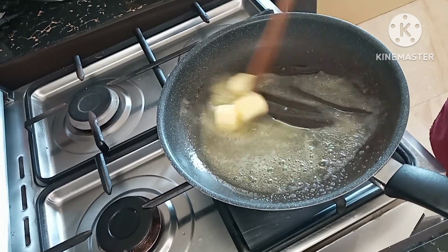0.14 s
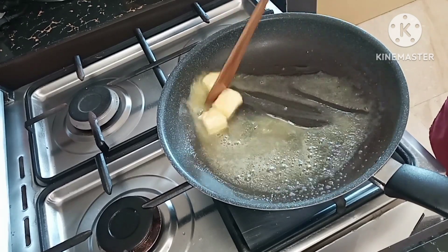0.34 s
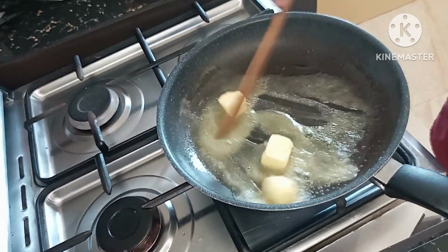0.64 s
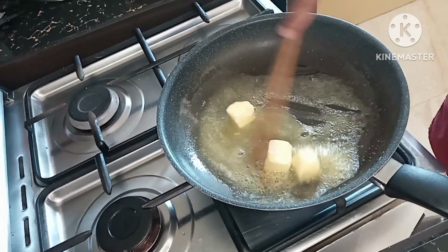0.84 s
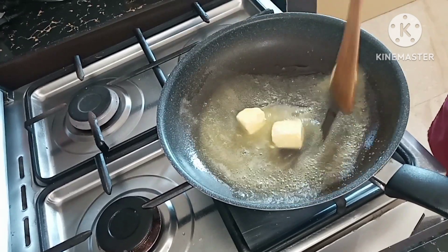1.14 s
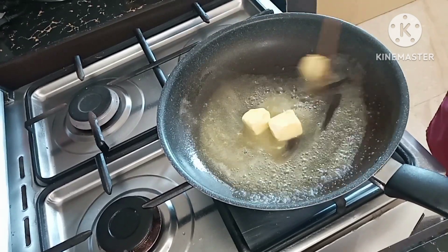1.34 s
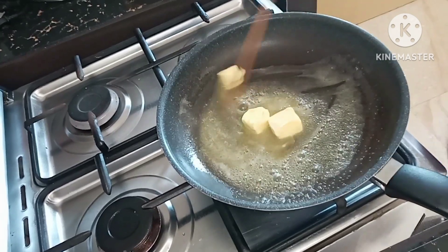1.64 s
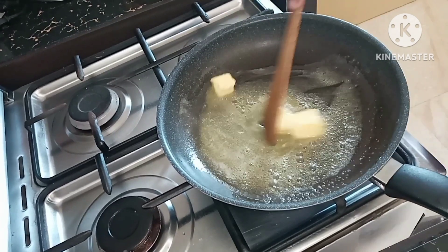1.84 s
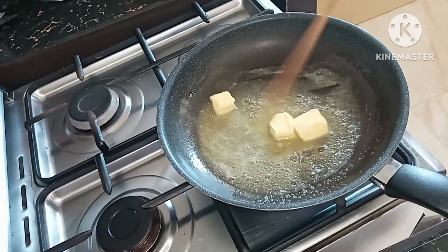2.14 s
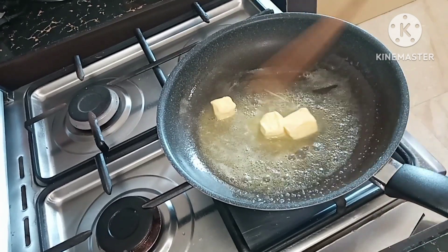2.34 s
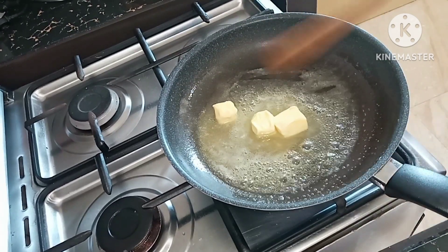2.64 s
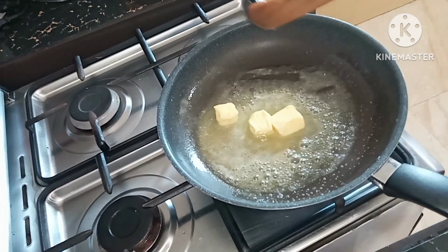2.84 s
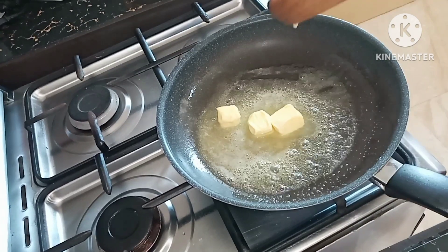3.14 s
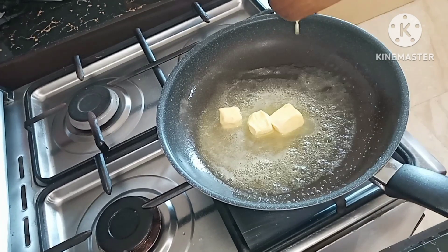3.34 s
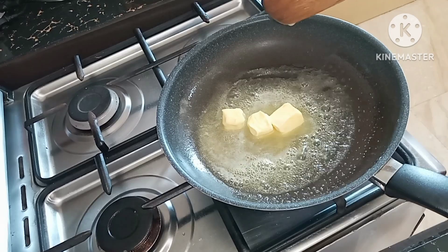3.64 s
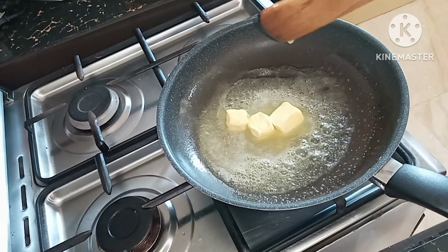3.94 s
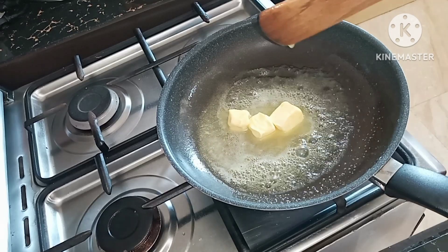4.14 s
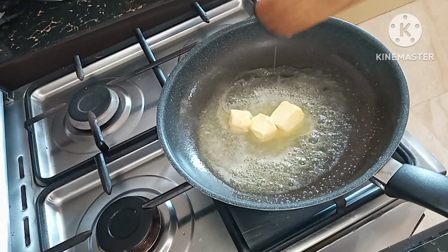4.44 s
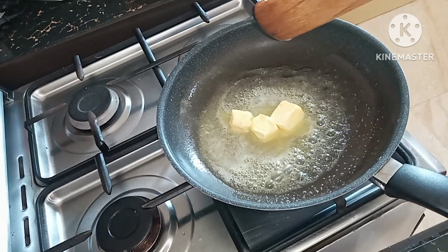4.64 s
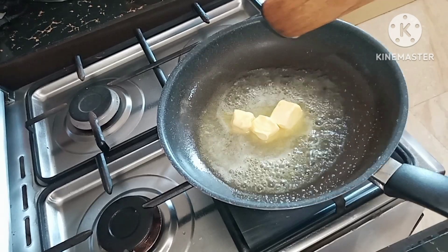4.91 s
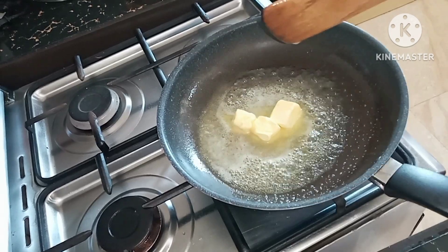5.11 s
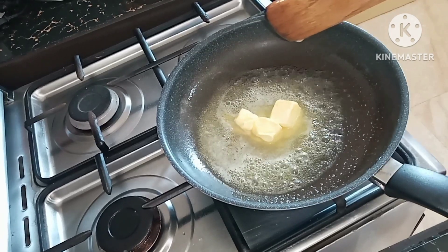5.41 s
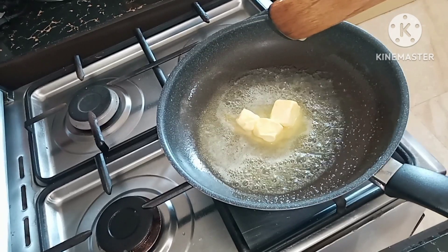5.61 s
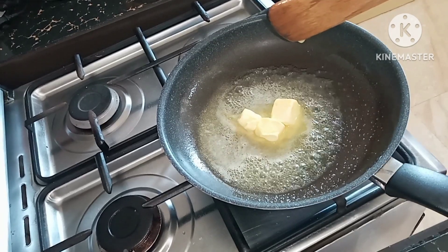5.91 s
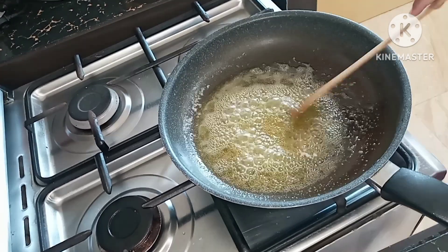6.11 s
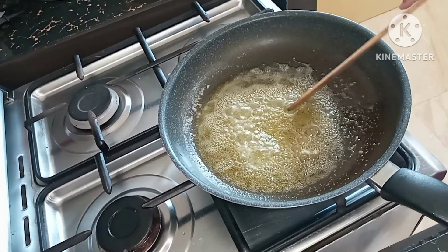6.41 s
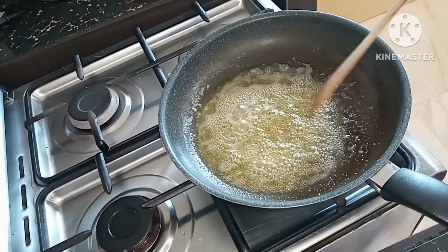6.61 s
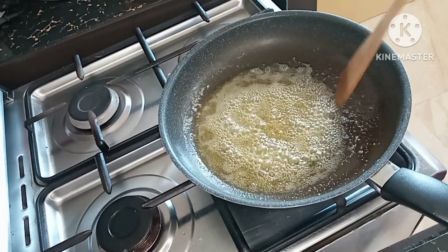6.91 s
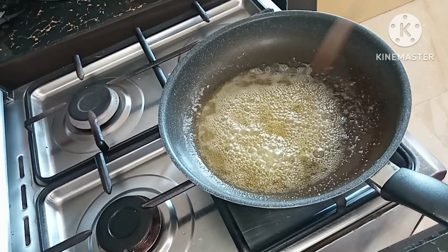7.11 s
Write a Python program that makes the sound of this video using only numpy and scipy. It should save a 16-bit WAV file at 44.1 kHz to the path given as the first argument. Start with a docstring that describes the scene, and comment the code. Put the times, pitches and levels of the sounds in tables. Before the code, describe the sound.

Butter sizzles and pops in a frying pan as a wooden spatula knocks lightly; after a brief silence, it foams with lower bubbling.

```python
"""Kitchen, close to a frying pan on a gas stove; stereo microphone, each of its two ports with its own colour.
From the start the burner rumbles and butter sizzles: water under the fat bursts as tiny steam bubbles
over a fine hiss, and the handled pan sets the stove droning. Until about 3.5 s a wooden spatula knocks
and rubs the pan. The sizzle deepens as the butter melts, then fades to silence at 6.1 s. At 6.4 s the
sound returns: the butter is now a foam of larger, lower bubbles."""
import sys
import numpy as np
from scipy import signal
from scipy.fft import rfft, irfft, next_fast_len
from scipy.io import wavfile
from scipy.ndimage import uniform_filter1d, map_coordinates

SR = 44100
rng = np.random.default_rng(int(sys.argv[2]) if len(sys.argv) > 2 else 0)


def generate_wav(sig):
    """Save sig (samples, or channels by samples) to the path in sys.argv[1] as 16-bit PCM at SR."""
    pcm = np.round(np.clip(np.atleast_2d(sig).T, -1, 1) * 32767).astype(np.int16)
    wavfile.write(sys.argv[1], SR, pcm)


N = 320053
LAG_S = .00092  # the left port is farther from the stove

# Colour of the sizzle at each microphone port: f/Hz, level/dB
LEFT_PORT = [(600, -30.5), (1300, -18), (2000, -13.5), (3300, -12), (4400, -9), (5200, -9.5), (6600, -3),
             (8200, -2), (9300, -6.5), (10500, -12.5), (12000, -16.5), (13800, -22.5), (15000, -4.5),
             (15600, -8.5)]
RIGHT_PORT = [(600, -29.5), (1300, -25.5), (2700, -23), (3200, -22.5), (3600, -16.5), (4500, -12.5),
              (6500, -11.5), (8100, -15.5), (9500, -12.5), (11200, -3.5), (12500, -11.5), (13800, -14.5),
              (14600, -8.5), (15600, -8.5)]
# Course of the sizzle while the butter melts, and once it foams: t/s, level/dB
MELTING = [(0.0, -25.5), (0.3, -23.5), (0.57, -24.5), (0.62, -27), (0.75, -24.5), (0.95, -26.5),
           (1.2, -23.5), (1.27, -26), (1.85, -27), (2.1, -28.5), (2.75, -27.5), (2.93, -25.5), (3.2, -28.5),
           (3.29, -25), (3.32, -34), (3.38, -27.5), (4.0, -31), (4.16, -29.5), (4.25, -30.5), (4.92, -28.5),
           (5.05, -32), (5.21, -27.5), (5.57, -32), (5.86, -27), (5.94, -30), (6.09, -29.5)]
FOAMING = [(6.43, -38), (6.81, -32), (6.846, -37.5), (6.86, -32.5), (7.04, -37), (7.1, -32), (7.257, -33.5)]
# Jolts of the handled pan on the stove: t/s, hold/s, level/dB, loudest f/Hz
JOLTS = [(0.0, 0.23, -53, 170), (0.47, 0.089, -55.5, 150), (0.796, 0.023, -64.5, 138),
         (1.126, 0.31, -45, 168.6), (1.606, 0.053, -45, 138), (1.9, 0.24, -63, 138),
         (2.222, 0.15, -54, 138), (2.567, 0.054, -64, 138), (5.654, 0.027, -53.5, 138),
         (6.457, 0.068, -42, 170)]


def amp(db):
    return 10 ** (np.asarray(db) / 20)


def unit(x):
    """Scale so that the mean of the channels has rms 1."""
    return x / np.sqrt(np.mean(np.atleast_2d(x).mean(0) ** 2) + 1e-20)


def along(points, hz):
    """Read (f/Hz, value) points on a log frequency axis."""
    f, value = np.transpose(points)
    return np.interp(np.log(hz + 1), np.log(f + 1), value)


def gain_curve(rows):
    """One gain per sample from (t/s, level/dB) rows; silent outside their span."""
    s, db = np.transpose(rows)
    return amp(np.interp(np.arange(N) / SR, s, db, left=-200, right=-200))


def wobble(rate):
    """A smooth random curve, rate knots a second."""
    coarse = np.arange(0, N + 64, 64)
    knots = rng.standard_normal(int(N * rate / SR) + 4)
    return np.interp(np.arange(N), coarse, map_coordinates(knots, [coarse * rate / SR]))


def filtered(x, response):
    """Apply a complex frequency response."""
    size = next_fast_len(N + SR // 2)
    return irfft(rfft(x, size) * response(np.fft.rfftfreq(size, 1 / SR)), size)[..., :N]


def ports(x):
    """One near source at both microphone ports, the left later."""
    return filtered(x, lambda hz: np.exp(-1j * np.pi * hz * LAG_S * np.array([[1], [-1]])))


def port_colour(stereo, tint_db):
    """Each port's colour plus a tint; minimum phase, so no sound comes before its cause."""
    size, heard = 4096, []
    hz = np.fft.rfftfreq(size, 1 / SR)
    for channel, port in zip(stereo, (LEFT_PORT, RIGHT_PORT)):
        cepstrum = irfft(np.log(amp(along(port, hz) + tint_db(hz))))
        cepstrum[1:size // 2] *= 2
        cepstrum[size // 2 + 1:] = 0
        heard.append(signal.fftconvolve(channel, irfft(np.exp(rfft(cepstrum))))[:N])
    return np.array(heard)


def pan_reflections(x, t60, wet_db):
    """The pan's walls and the stove top throw back a short scattered answer."""
    t = np.arange(SR // 10) / SR
    tail = rng.standard_normal((2, len(t))) * amp(-60 * t / t60) * (t > .0008)
    return x + amp(wet_db) * signal.fftconvolve(x, tail / np.linalg.norm(tail[0]), axes=1)[:, :N]


def jolt_gains():
    """Each jolt of the pan swells, holds and dies away: one gain curve per jolt."""
    attack_s, release_s = .023, .032
    s, hold, db, _ = np.transpose(JOLTS)[:, :, None]
    t = np.arange(N) / SR - s
    return amp(db) * np.clip(t / attack_s + 1, 0, 1) * np.exp(-np.clip(t - hold, 0, None) / release_s)


def burner():
    """The flame's lumpy roar, mostly straight from the stove; it swells to a thud under each jolt."""
    # Spectrum of the roar: f/Hz, level/dB
    spectrum = [(20, -22), (40, -15), (62, 1.5), (100, -3.5), (200, -15.5), (320, -12.5), (500, -15),
                (1000, -22.5), (2000, -59)]
    # Course of the flame: t/s, level/dB
    flame = [(0.0, -61.5), (1.9, -62), (2.2, -63), (2.5, -65), (2.95, -56.5), (3.15, -54.5), (3.5, -56.5),
             (4.1, -56), (4.4, -58), (4.75, -54.5), (5.5, -60), (5.9, -57.5), (6.02, -60.5), (6.6, -60),
             (7.0, -60), (7.257, -59)]
    near = ports(amp(1.8 * wobble(6.5)) * rng.standard_normal(N))
    near = filtered(near, lambda f: amp(along(spectrum, f)))
    far = rng.standard_normal((2, N))
    far = filtered(far, lambda f: amp(along(spectrum, f) - 9.5) * np.sqrt(f / 150))
    roar = unit((near + far) * amp([[1.3], [-1.3]]))
    flame_gain = gain_curve(flame) * amp(3.5 * wobble(9))
    thud_gain = amp(-8.5) * jolt_gains().sum(0)
    return (flame_gain + thud_gain) * roar


def stove_metal():
    """Sheet metal hums in wavering tones. Returns the low drone, which jolts swell, and the overtones."""
    # Resonances of the stove: f/Hz, width/Hz, level/dB
    resonances = [(136.4, 18, 6.5), (170, 43, 3), (214, 34, 0), (271.3, 17, -12.5), (349.2, 12, -12),
                  (417.7, 21, -11.5)]
    rest_db, fall_db_per_octave = -73, 36.5
    tones = []
    for hz, width, db in resonances:
        shake = amp(db + 1.1 * wobble(11)) * rng.standard_normal(N)
        tones.append(filtered(shake, lambda f: (1j * f * width / (hz**2 - f**2 + 1j * f * width)) ** 2))
    drone, jolts, jolt_hz = 0, jolt_gains(), np.transpose(JOLTS)[3]
    for (hz, _, db), tone in zip(resonances, tones[:3]):
        resting = amp(rest_db + db + 3.5 * wobble(6))
        jolted = amp(-fall_db_per_octave * np.abs(np.log2(hz / jolt_hz))) @ jolts
        drone = drone + (resting + jolted) * unit(tone)
    overtones = unit(ports(sum(tones[3:])) * amp([[1.8], [-1.8]]))
    return ports(drone) * amp([[.6], [-.6]]), overtones


def bubbles(s, hz, size, life_s):
    """Steam bubbles ring for about a millisecond; where each bursts sets its delay and phase at a port."""
    k, out = np.arange(128), []
    life = life_s * (6000 / hz) ** .35  # larger bubbles last a little longer
    age = k / SR / life[:, None]
    swell = (age * np.exp(1 - age)) ** 2
    place = rng.standard_normal((len(s), 3))
    for side, delay_s in enumerate((LAG_S / 2 + .00012 * place[:, 0], -LAG_S / 2)):
        start = np.round((s + delay_s - life) * SR).astype(int)
        phase = 2 * np.pi * hz[:, None] * k / SR + .99 * place[:, [1 + side]]
        wave = size[side][:, None] * swell * np.sin(phase)
        out.append(np.bincount(np.clip(start[:, None] + k, 0, N).ravel(), wave.ravel(), N + 1)[:N])
    return np.array(out)


def hiss():
    """The smallest bubbles merge into noise whose gain drifts in small patches of time and frequency."""
    spectra = signal.stft(rng.standard_normal((2, N)), nperseg=256)[2]
    patches = uniform_filter1d(rng.standard_normal(spectra.shape[1:]), size=3, axis=0)
    patches = uniform_filter1d(patches, size=8, axis=1)
    patches_db = 2.7 * unit(patches.ravel()).reshape(patches.shape)
    return signal.istft(spectra * amp(patches_db), nperseg=256)[1][:, :N]


def sizzle(span, tint, spread_db, cap, low_hz, hiss_db):
    """Water under the fat boils off in flurries of bubbles, and the hiss swells with them."""
    base_rate = 2600  # bubbles a second; flurries raise and lower it
    flurry_db = 1.4 * (.6 * wobble(9) + 1.1 * wobble(55))
    frying = (np.arange(N) > span[0][0] * SR) & (np.arange(N) < span[-1][0] * SR)
    count = np.cumsum(frying * base_rate * amp(flurry_db) / SR)
    s = np.flatnonzero(np.diff(np.floor(count))) / SR
    draw = rng.random((len(s), 5))
    hz = 1200 + 15000 * draw[:, 0]
    strength_db = spread_db * np.minimum(-np.log(draw[:, 1]), cap)
    side_db = 5 * (draw[:, 2:4].T - .5)
    size = amp(strength_db + side_db) * np.minimum(hz / low_hz, 1) ** 2  # too large for the film: weak
    crackle = bubbles(s + draw[:, 4] / base_rate, hz, size, life_s=.00012 + .0003 * rng.random(len(s)))
    crackle = pan_reflections(crackle / np.sqrt(np.mean(crackle[:, frying] ** 2)), t60=.05, wet_db=-4)
    fat = crackle + amp(hiss_db + .5 * flurry_db) * hiss()
    # Bubbles make no bass.
    heard = port_colour(fat, lambda f: along(tint, f) + 9 * np.log2(np.clip(f / 600, .01, 1)))
    return heard / np.sqrt(np.mean(heard.mean(0)[frying] ** 2))


def melting_butter():
    """As the pool of fat deepens, the larger, lower bubbles steadily gain."""
    below_hz, db_per_s, even_at_s = 5600, .62, 3
    fat = sizzle(MELTING, tint=[(1000, 0)], spread_db=4, cap=3, low_hz=4400, hiss_db=1)
    low = filtered(fat, lambda hz: 1 / (1 + (hz / below_hz) ** 4))
    return fat + low * (amp(db_per_s * (np.arange(N) / SR - even_at_s)) - 1)


def pops():
    """The loudest bursts: the film tears with a wide snap, then the cavity rings."""
    # Single steam bursts: t/s, level/dB, f/Hz
    bursts = [(0.0844, -9.5, 7140), (0.2922, -10.5, 8350), (0.4766, -15, 6700), (0.577, -13, 7550),
              (0.632, -17, 8360), (0.702, -14, 7000), (0.738, -11, 7000), (0.8679, -13, 6800),
              (1.0894, -16, 8300), (1.2035, -16, 7600), (1.2775, -20, 6140), (1.3329, -10, 6950),
              (1.5068, -10, 7400), (1.5602, -10.5, 7170), (1.709, -10, 7500), (1.7264, -15, 7800),
              (1.7878, -12.5, 6950), (1.805, -9.5, 6500), (1.824, -10, 7820), (1.8402, -9.5, 7900),
              (1.9265, -12, 8250), (1.9973, -10, 7100), (2.0892, -12, 7140), (2.1696, -8.5, 8250),
              (2.2358, -12, 7040), (2.3444, -12, 8000), (2.386, -9, 8300), (2.409, -11, 8630),
              (2.4162, -13.5, 6840), (2.477, -10, 8450), (2.575, -12, 7180), (2.6359, -15, 7290),
              (2.7087, -13, 7500), (2.7791, -10, 8100), (2.8499, -11.5, 7890), (2.9278, -10, 8300),
              (3.056, -12, 7770), (3.1075, -10, 11200), (3.1406, -9, 11200), (3.2434, -15, 4340),
              (3.4116, -11.5, 7500), (3.4755, -14, 10900), (3.5818, -11.5, 8600), (3.658, -8.5, 8500),
              (4.0507, -11, 6640), (4.0943, -9.5, 8400), (4.2956, -15, 7260), (4.355, -21, 8100),
              (4.2968, -17, 4130), (4.38, -13, 6450), (4.4124, -20, 4560), (4.462, -15.5, 4400),
              (4.5431, -17, 7100), (4.805, -8, 11400), (4.8454, -13.5, 8130), (4.8983, -13.5, 7950),
              (4.929, -17.5, 3760), (4.9713, -15, 11300), (5.1213, -12, 6090), (5.168, -12, 8500),
              (5.192, -13, 6200), (5.237, -15, 10000), (5.3125, -10.5, 7050), (5.313, -13.5, 4500),
              (5.4228, -15, 9000), (5.461, -16, 10500), (5.4917, -11, 8040), (5.7409, -18, 5450),
              (5.7575, -17, 11000), (5.768, -26, 7500), (5.8698, -10.5, 6420), (5.958, -10, 4230),
              (5.968, -13.5, 6450), (5.987, -19, 7050), (6.4494, -22.5, 3430), (6.4662, -19, 11000),
              (6.5041, -24, 4170), (6.544, -21, 3160), (6.567, -29, 11200), (6.587, -25.5, 2440),
              (6.602, -14, 8400), (6.6025, -18, 10300), (6.603, -17, 12300), (6.6028, -18, 15000),
              (6.618, -24, 3320), (6.64, -20.5, 3360), (6.6538, -12.5, 7560), (6.6545, -23, 11500),
              (6.6733, -18, 3160), (6.675, -23, 2100), (6.688, -22, 3200), (6.726, -25, 4500),
              (6.7499, -14.5, 8400), (6.754, -12.5, 6610), (6.8034, -15, 3080), (6.812, -16, 6500),
              (6.853, -18, 7050), (6.8595, -9.5, 6430), (6.8603, -23, 12000), (6.888, -29, 2150),
              (6.8905, -22, 3100), (6.8944, -17, 6690), (6.921, -20, 4000), (6.92, -22, 11500),
              (6.963, -27, 12300), (6.9701, -18.5, 4020), (7.019, -22, 11300), (7.0687, -15, 3120),
              (7.1086, -9.5, 7700), (7.109, -21, 10400), (7.1387, -14.5, 3170), (7.157, -17, 2960),
              (7.165, -18.5, 5500), (7.174, -28, 1820), (7.185, -21.5, 2350), (7.197, -27, 2000),
              (7.195, -26, 6000)]
    rise_s, tear_s = .001, .0003  # times to peak of the burst and of its tear
    s, db, hz = np.transpose(bursts)
    lean_db = 1.1 * (along(LEFT_PORT, hz) - along(RIGHT_PORT, hz))  # to the port that favours the pitch
    size = 2 * amp(db) / (1 + amp([-lean_db, lean_db]))
    k = np.arange(128)
    age = k / SR / tear_s
    tear = (age * np.exp(-age)) ** 2 * rng.standard_normal((len(s), len(k)))
    tear_db = db + 3 * np.log2(hz / 7000) - 6 * (s > FOAMING[0][0])  # small ones snap more; foam muffles
    tear = tear / np.linalg.norm(tear, axis=1, keepdims=True) * amp(tear_db)[:, None]
    start = np.round((s + rise_s - tear_s) * SR).astype(int)
    tears = ports(np.bincount((start[:, None] + k).ravel(), tear.ravel(), N))
    snaps = amp(9) * port_colour(tears, lambda f: 3.5 * np.log2((f + 1) / 7000))
    rings = bubbles(s + rise_s, hz, size, life_s=.0004)
    return pan_reflections(rings + snaps, t60=.05, wet_db=-6)


def spatula():
    """A knock cracks, rings the pan and leaves it chattering on its grate; a rub feeds its modes noise."""
    # Wood striking the pan: t/s, level/dB, loudest f/Hz, reach/octaves, crack/dB, crack f/Hz, chatter/dB
    knocks = [(.35, -21, 650, 0.85, -12, 1670, -29), (.363, -17, 550, 0.38, -34, 1700, -38),
              (1.128, -12.5, 800, 1.3, -12, 2750, -25.5), (1.3065, -28.5, 1400, 2.3, -5, 2640, -21),
              (2.658, -24, 430, 0.51, -4, 1690, -32), (2.676, -32, 630, .5, -6, 1400, -31.5),
              (2.695, -33, 1100, 0.7, -6, 1450, -24)]
    # Wood sliding on the pan: t/s, length/s, level/dB, loudest f/Hz, reach/octaves
    rubs = [(.41, 0.045, -36, 520, 0.53), (.72, 0.12, -26, 3200, 0.57), (1.168, 0.068, -35, 800, 0.48),
            (2.783, 0.062, -45, 780, 0.19), (2.95, 0.12, -39, 1050, 0.09), (2.94, .09, -43, 900, 0.12),
            (3.01, .08, -43, 850, 0.15), (3.4, 0.1, -46.5, 2050, .08), (2.985, .045, -41.5, 2050, .08),
            (3.05, .09, -46, 2050, .08), (2.958, 0.056, -38.5, 346, 0.16), (3.26, 0.044, -39, 2050, .12)]
    # Modes of the pan: f/Hz, level/dB, t60/s
    pan_modes = [(205, -10, 0.074), (333, -4.5, 0.044), (493, 1, 0.071), (589, 3, 0.046), (696, 2.5, 0.032),
                 (775, 1, 0.04), (916, -4.5, 0.049), (1050, -7.5, 0.045), (1120, -7, 0.039),
                 (1277, -3, 0.035), (1457, -2, 0.045), (1724, -1, 0.045), (2042, -5, 0.06),
                 (2430, 3.5, 0.017), (2885, 6.5, 0.017), (3480, 1.5, 0.013)]
    pan, t = np.zeros(N + SR), np.arange(SR // 4) / SR
    hz, level, t60 = np.transpose(pan_modes)[:, :, None]
    sign = (-1) ** np.arange(len(pan_modes))[:, None]

    def ringing(force, loud_hz, reach):
        """A force drives mainly the modes near loud_hz."""
        weight = sign * amp(level + rng.normal(0, 1.5, hz.shape) - 6.6 * (np.log2(hz / loud_hz) / reach)**2)
        response = (weight * amp(-60 * t / t60) * np.sin(2 * np.pi * hz * t)).sum(0)
        return signal.fftconvolve(force, response)[:len(t)]

    for s, db, loud_hz, reach, crack_db, crack_hz, chatter_db in knocks:
        force = amp(chatter_db - 60 * t / .26) * rng.standard_normal(len(t))
        force[0] = 1  # the blow, ahead of the chatter
        ring = ringing(force, loud_hz, reach) * amp(8.5 * np.exp(-t / .0012))  # the wood answers briefly
        smear = np.cumsum(rng.normal(0, .23, len(t)))  # widens the crack to a band of wood tones
        crack = amp(crack_db - 60 * t / .041) * np.sin(2 * np.pi * crack_hz * t + smear)
        pan[round(s * SR):][:len(t)] += amp(db) * (ring / np.abs(ring).max() + crack)
    for s, length, db, loud_hz, reach in rubs:
        stroke = np.sqrt(np.hanning(round(length * SR))) * rng.standard_normal(round(length * SR))
        rub = ringing(stroke, loud_hz, reach)
        pan[round(s * SR):][:len(t)] += amp(db) * rub / np.abs(rub).max()
    pan = filtered(pan[:N], lambda f: (1j * f / (196 + 1j * f)) ** 2)  # knocks and rubs carry little bass
    return pan_reflections(ports(pan) * amp([[3.5], [1.5]]), t60=.15, wet_db=-15)


def fades():
    """The sound sinks, stops, and later climbs back."""
    stop, start = MELTING[-1][0], FOAMING[0][0]
    out_s, edge_s, in_s = .095, .004, .23
    times = [stop - out_s, stop, stop + edge_s, start - edge_s, start, start + in_s]
    return np.interp(np.arange(N) / SR, times, [1, amp(-13), 0, 0, amp(-17), 1])


def foaming_butter():
    """Foam favours the larger bubbles and damps the small."""
    # Colour of the foam: f/Hz, level/dB
    foam_tint = [(600, 4), (1200, -0.5), (2000, 0.5), (3000, 7), (3800, -1.5), (5000, -3.5), (6500, -5.5),
                 (8500, -8.5), (11000, -14.5), (13500, -19), (15500, -22)]
    return sizzle(FOAMING, foam_tint, spread_db=4.3, cap=2.2, low_hz=2600, hiss_db=-2.5)


def scene():
    """Two stretches of frying with silence between; the stove's overtones follow the sizzle's level."""
    drone, overtones = stove_metal()
    mix = burner() + drone + pops() + spatula()
    for course, fat, hum_db in ((MELTING, melting_butter(), -42), (FOAMING, foaming_butter(), -37)):
        waver = amp(.52 * wobble(7))
        mix += gain_curve(course) * (waver * fat + amp(hum_db) * overtones)
    return mix * fades()


def record(dry):
    """The microphone chain keeps nothing above its band limit."""
    top_hz, edge_hz = 15750, 200
    return filtered(dry, lambda hz: np.cos(np.pi / 2 * np.clip((hz - top_hz) / edge_hz + .5, 0, 1)) ** 2)


dry = scene()
out = record(dry)
generate_wav(out)
```